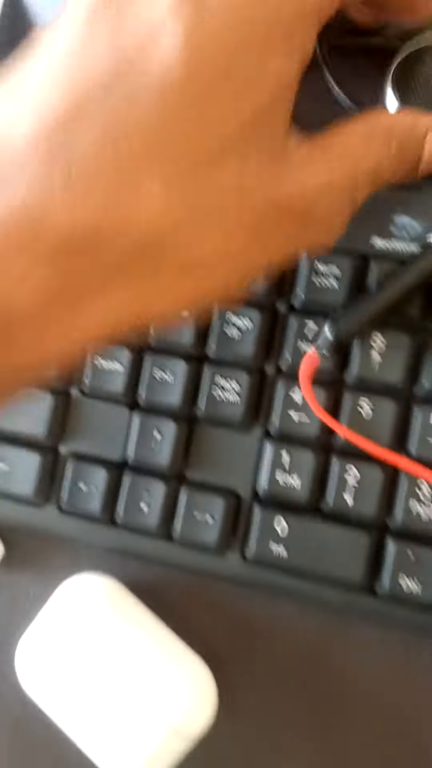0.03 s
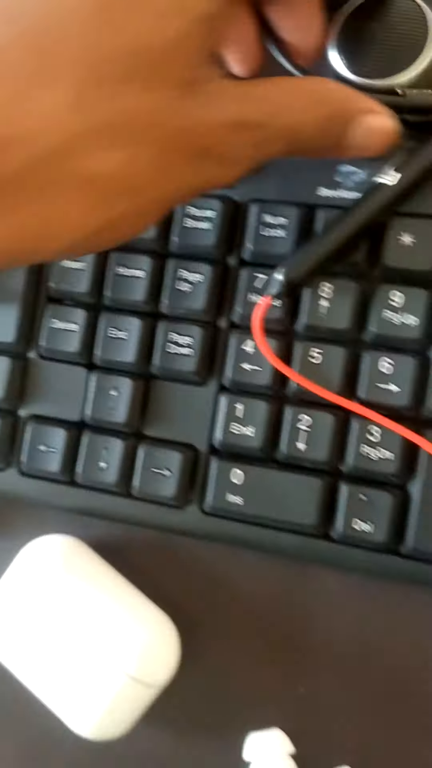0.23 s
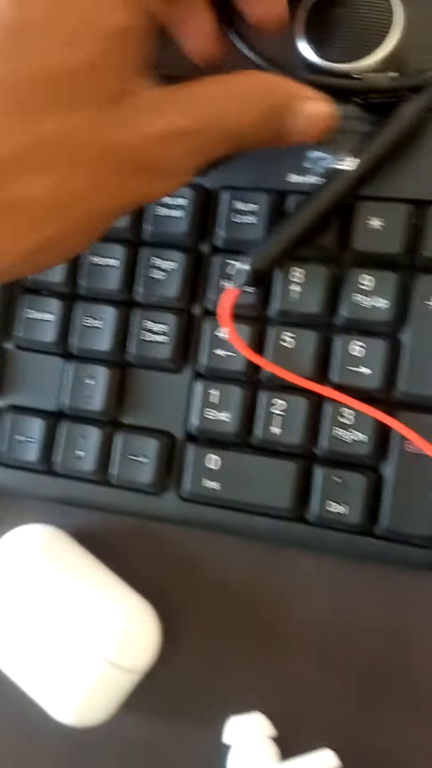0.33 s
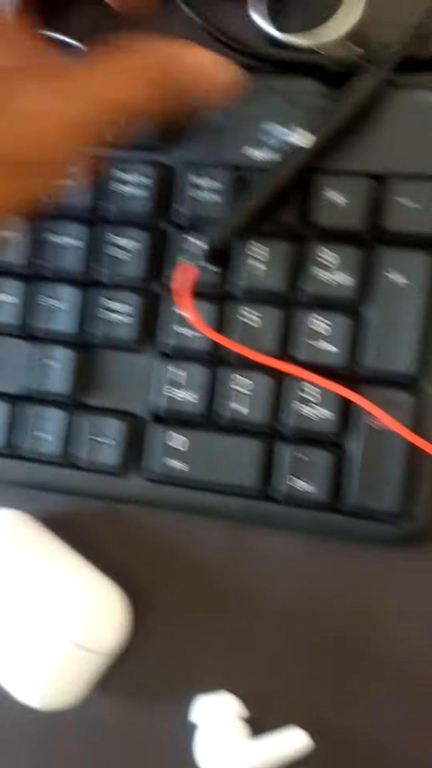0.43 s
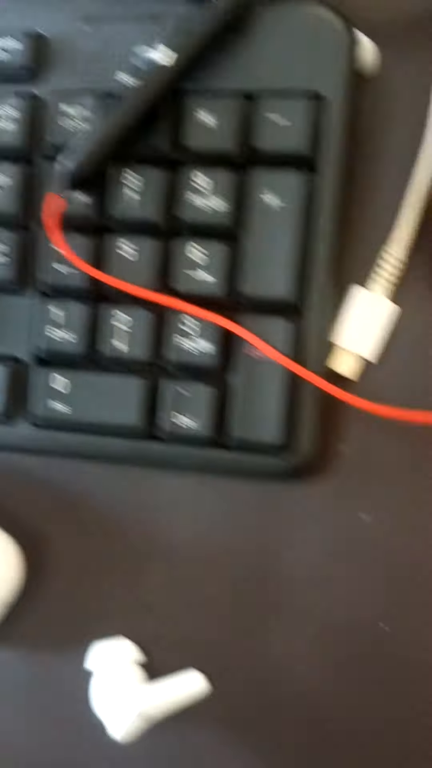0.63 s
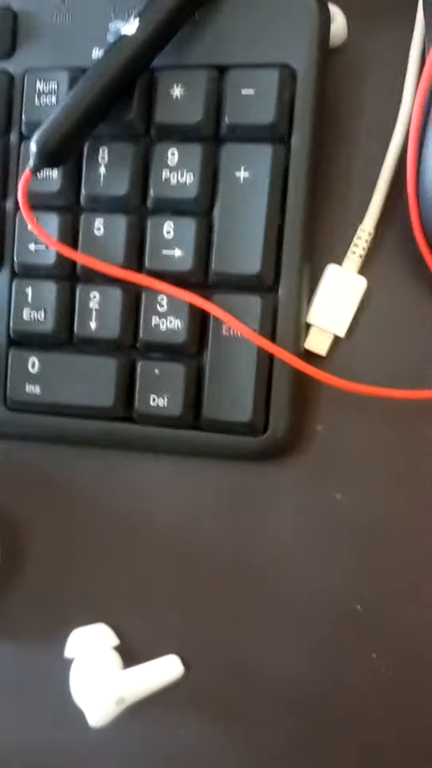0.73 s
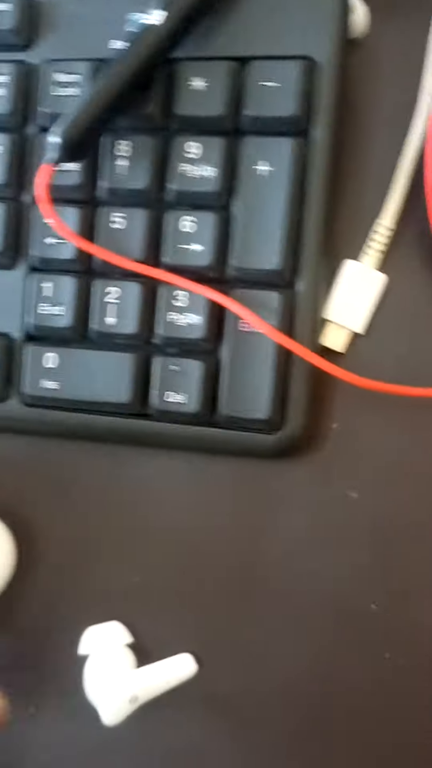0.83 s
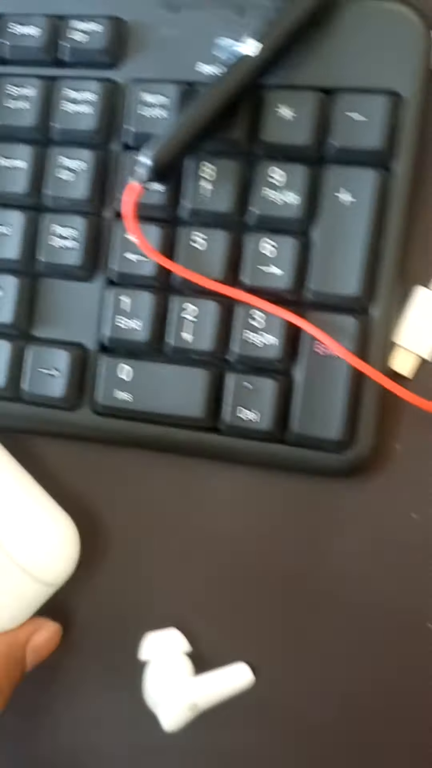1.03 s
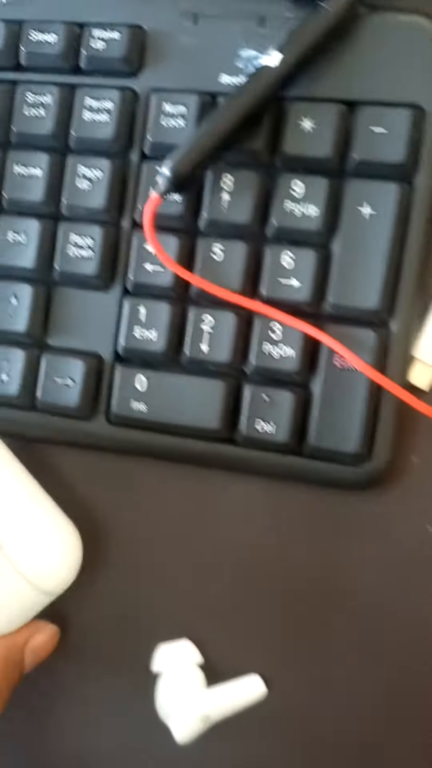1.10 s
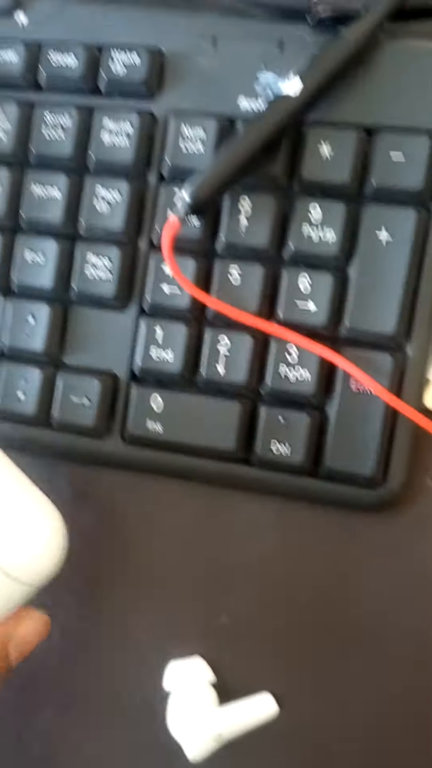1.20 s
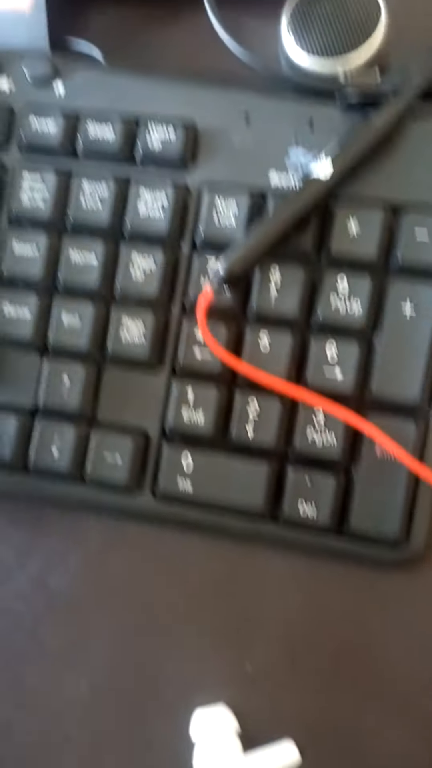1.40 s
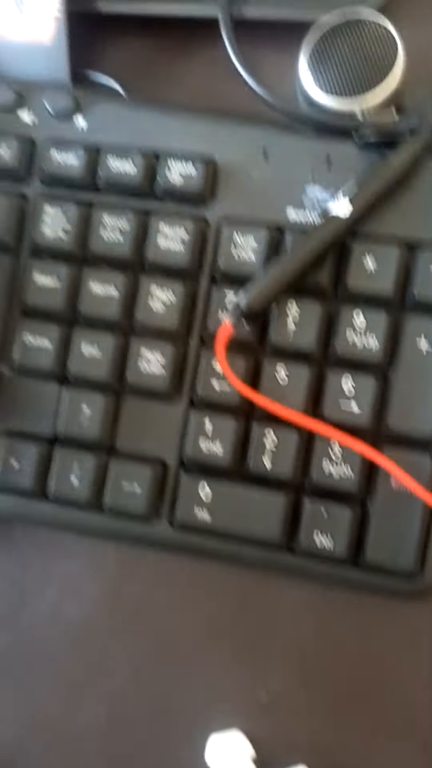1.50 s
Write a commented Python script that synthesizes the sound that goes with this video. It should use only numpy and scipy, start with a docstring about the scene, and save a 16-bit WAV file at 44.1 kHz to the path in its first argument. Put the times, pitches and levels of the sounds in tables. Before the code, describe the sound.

One close, dull thump as a plastic earbud case lands on a desk, over quiet rumble.

```python
"""A small plastic case is put down on a desk close by: it touches, lands and settles in one dull thump.
Each contact rings the desk top and the shell, the shell scuffs briefly and a small room answers.
A soft high hiss swells just before the thump and fades after it.
Handling adds a few light plastic ticks and soft low bumps. Behind it lie a quiet room rumble,
a low hum that swells and fades, steady tones and a faint whine."""
import sys
import numpy as np
from scipy import signal
from scipy.fft import rfft, irfft
from scipy.io import wavfile
from scipy.ndimage import uniform_filter1d

SR = 44100
rng = np.random.default_rng(int(sys.argv[2]) if len(sys.argv) > 2 else 0)


def master(y):
    """Save y as 16-bit WAV."""
    cut = np.clip(np.atleast_2d(y).T, -1, 1)
    pcm = np.round(cut * 32767)  # scale
    wavfile.write(sys.argv[1], SR, pcm.astype(np.int16))


N = 68355
TIME_S = np.arange(N) / SR
BINS_HZ = np.arange(N // 2 + 1) * SR / N


def undb(db):
    """Decibels to gain."""
    return 10 ** (np.asarray(db) / 20)


def unit(x):
    """Scale to rms 1."""
    return x / np.sqrt(np.mean(x ** 2))


def pan(side_db):
    """Left and right gains, side_db apart."""
    return undb(np.array([[side_db], [-side_db]]) / 2)


def decay(start_s, t60_s):
    """Silence until the start, then exponential decay."""
    age_s = TIME_S - start_s
    return (age_s >= 0) * np.exp(-np.log(1000) * np.maximum(age_s, 0) / t60_s)


def over_time(points):
    """Rows of (seconds, value) read at every sample."""
    return np.interp(TIME_S, *np.array(points).T)


def over_hz(points):
    """Rows of (Hz, value) read at every frequency bin."""
    hz, value = np.array(points, float).T
    return np.interp(np.log(np.maximum(BINS_HZ, 1)), np.log(hz), value)


def walk(rate_hz):
    """Smooth random motion, rms 1."""
    span = max(int(SR / rate_hz), 1)
    smoothed = uniform_filter1d(rng.standard_normal(N), span, mode="wrap")
    return unit(uniform_filter1d(smoothed, span, mode="wrap"))


def ring(x, response):
    """Pass a sound through an impulse response."""
    return signal.fftconvolve(np.atleast_2d(x), response, axes=1)[:, :N]


# Stereo image of the noise. Each row: frequency in Hz, left-right correlation.
CORRELATION = [(60, 0.64), (200, 1), (400, 0.78), (650, 0.38), (1200, 0.0072), (4000, 0.0089),
               (16000, -0.094)]


def stereo_noise(bin_gain):
    """Shaped noise at rms 1, alike on both sides in the bass."""
    mid, side = rfft(rng.standard_normal((2, N)))
    alike = np.clip(over_hz(CORRELATION), -1, 1)
    both = mid * np.sqrt(1 + alike) + np.array([[1], [-1]]) * side * np.sqrt(1 - alike)
    return unit(irfft(both * bin_gain, N))


def noise(spectrum, tilt_db_oct=0):
    """Stereo noise with a given spectrum and tilt."""
    tilted = [(hz, db + tilt_db_oct * np.log2(hz)) for hz, db in spectrum]
    return stereo_noise(undb(over_hz(tilted)))


def narrow_noise(hz, width_hz):
    """A noise band narrow enough to have a pitch."""
    return stereo_noise(1 / (1 + (2 * (BINS_HZ - hz) / width_hz) ** 2))


# Room noise spectrum. Each row: frequency in Hz, relative density in dB.
AIR_SPECTRUM = [(30, -30), (45, 0), (58, -2.5), (95, 1), (128, -2), (160, 4), (190, -6.5), (230, 2.5),
                (380, -0.5), (540, -9), (900, -5), (1100, -11.5), (1950, -12.5), (2800, -22.5),
                (5200, -25.5), (6800, -31), (8000, -41), (10000, -39.5), (13000, -36.5), (16000, -44)]
# Its slow drift. Each row: time in seconds, gain in dB.
AIR_DRIFT = [(0, 2), (.08, 2), (.22, 4), (.4, 2), (.65, 0), (.8, 0.6), (1.02, 1.5), (1.12, 0.5),
             (1.35, 1.5), (1.48, 2.5), (1.55, 3.5)]


def room_rumble(level_db=-38, waver_db=1.3, waver_below_hz=490):
    """Wavering rumble under an even hiss; both drift in level."""
    air = noise(AIR_SPECTRUM)
    rumble = irfft(rfft(air) / (1 + (BINS_HZ / waver_below_hz) ** 2), N)
    hiss = air - rumble
    waver = undb(waver_db * walk(rate_hz=17.6))
    return undb(level_db + over_time(AIR_DRIFT)) * (hiss + rumble * waver)


# Hum envelope. Each row: time in seconds, rms level in dB.
HUM_SWELL = [(0, -38), (.1, -42.5), (.2, -52), (.4, -43.5), (.65, -52.5), (.74, -41.5), (.97, -35.5),
             (1.08, -49), (1.22, -57), (1.32, -44), (1.41, -36), (1.47, -76), (1.55, -31.5)]


def hum(hz=107.9, wander=0.0092):
    """A low sine swells and fades, its pitch slightly unsteady."""
    cycles = np.cumsum(hz * (1 + wander * walk(rate_hz=9.5))) / SR
    return undb(over_time(HUM_SWELL)) * np.sqrt(2) * np.sin(2 * np.pi * cycles)


# Tones in the room. Each row: frequency in Hz, level in dB, width in Hz.
ROOM_TONES = [(162.2, -49.5, 11), (224.8, -49.5, 11.4), (345.5, -46.5, 2.7), (742.6, -55.5, 12),
              (914, -62.5, 19), (1323, -55, 57), (1848, -57.5, 49)]


def room_tones():
    """Faint pitched bands that sound throughout."""
    return sum(undb(db) * narrow_noise(hz, width_hz) for hz, db, width_hz in ROOM_TONES)


# Whine. Each row: start and end in seconds, frequency in Hz, level in dB, left over right in dB.
WHINE_SPELLS = [(0.7, 0.91, 1897, -58, -7), (1.3, 1.62, 1951, -54.5, 1)]


def whine(width_hz=32, fade_s=0.05):
    """A thin high band comes and goes."""
    out = 0
    for start_s, end_s, hz, db, side_db in WHINE_SPELLS:
        gate = np.clip(np.minimum(TIME_S - start_s, end_s - TIME_S) / fade_s, 0, 1)
        out += undb(db) * pan(side_db) * narrow_noise(hz, width_hz) * gate
    return out


# Reverb spectrum. Each row: frequency in Hz, relative density in dB.
REVERB_SPECTRUM = [(60, -24), (150, -4), (260, -1), (420, 7), (650, 6), (1000, -2.5), (3000, -9),
                   (12000, 1)]


def room_reverb(x):
    """Diffuse tail of a small room."""
    tail = noise(REVERB_SPECTRUM) * decay(start_s=0.015, t60_s=0.41)
    power_gain = np.mean(undb(over_hz(REVERB_SPECTRUM)) ** 2)
    return ring(x, tail * np.sqrt(power_gain / np.sum(tail[0] ** 2)))


# Handling nudges. Each row: start in seconds, level in dB.
NUDGES = [(0.054, -38), (0.237, -25.5), (0.289, -27), (1.309, -28.5)]


def bumps(hz=109.8, rise_s=0.012, t60_s=0.072):
    """Soft, low nudges swell and are quickly damped."""
    out = 0
    for start_s, db in NUDGES:
        age_s = TIME_S - start_s
        peak_s = start_s + rise_s
        envelope = np.where(TIME_S < peak_s, np.clip(age_s / rise_s, 0, 1), decay(peak_s, t60_s))
        out += undb(db) * envelope * np.sin(2 * np.pi * hz * age_s)
    return out


# Handling ticks. Each row: start in seconds, ping gain in dB, tilt in dB per octave,
# ping left over right in dB, rattle level in dB, rattle T60 in seconds.
TICK_HITS = [(0.0527, -37, -1, 13, -35, 0.035), (0.0991, -31, -4, 0, -37, 0.02),
             (0.249, -52, 0.5, -5, -31, 0.026), (0.249, -30, -6, 8.5, -36, 0.062),
             (0.2773, -52, 4, -3, -44, 0.012), (0.8795, -27.5, 1.5, -6.5, -39, 0.025),
             (0.8815, -29, -4.5, 8.5, -42, 0.015)]
# Modes of the ticking plastic. Each row: frequency in Hz, relative level in dB, T60 in seconds.
TICK_MODES = [(1050, -9, 0.011), (1955, -0.5, 0.0054), (4630, -0.5, 0.0078), (5340, -3, 0.0047),
              (6600, -8, 0.0031), (8300, -18, 0.0064), (11770, -6, 0.004), (13500, -4, 0.0042),
              (14750, -15, 0.004)]
# Rattle after a tick. Each row: frequency in Hz, relative density in dB.
RATTLE_SPECTRUM = [(500, -2), (1500, -3), (3000, 0), (5200, 0), (8500, -16.5), (12500, -5), (16000, -12)]


def ticks(pivot_hz=4000, right_lag_s=0.0001205):
    """Tiny hard contacts ring and rattle the plastic; sharper ones favour its high modes."""
    age_s = np.arange(N // 20) / SR - np.array([[0], [right_lag_s]])
    out = np.zeros((2, N))
    for start_s, db, tilt_db_oct, side_db, rattle_db, rattle_t60_s in TICK_HITS:
        ping = 0
        for hz, mode_db, t60_s in TICK_MODES:
            gain = undb(mode_db + tilt_db_oct * np.log2(hz / pivot_hz))
            ping += gain * np.sin(2 * np.pi * hz * age_s) * np.exp(-np.log(1000) * age_s / t60_s)
        first = int(start_s * SR)
        out[:, first:first + age_s.shape[1]] += undb(db) * pan(side_db) * ping * (age_s >= 0)
        out += undb(rattle_db) * noise(RATTLE_SPECTRUM, tilt_db_oct) * decay(start_s, rattle_t60_s)
    return out


# Brief scuffs and, at 0.156 s, a swelling hiss. Each row: start, attack, hold and release T60
# in seconds, level in dB, tilt in dB per octave.
NOISE_BURSTS = [(0.064, 0.0047, 0.017, 0.071, -42.5, 4.5), (0.076, 0.0022, 0.004, 0.049, -34, -5),
                (0.156, 0.095, 0.025, 0.38, -38.5, 4.5), (0.2408, 0.0072, 0.0069, 0.16, -31.5, 0.5),
                (0.254, 0.014, 0.017, 0.27, -34, -3.5)]
# Their spectrum. Each row: frequency in Hz, relative density in dB.
BURST_SPECTRUM = [(500, -2), (1000, 5), (2000, 6.5), (2900, -2.5), (4000, -2.5), (6000, -12.5), (8500, -23),
                  (10500, -21), (12300, -15), (16000, -23)]


def scuffs_and_hiss(grain_db=1.5):
    """Brief grainy scuffs of plastic; a soft high hiss swells just before the thump and fades after it."""
    out = 0
    for start_s, attack_s, hold_s, t60_s, db, tilt_db_oct in NOISE_BURSTS:
        end_s = start_s + attack_s + hold_s
        attack = np.clip((TIME_S - start_s) / attack_s, 0, 1) ** 2
        release = np.where(TIME_S < end_s, 1, decay(end_s, t60_s))
        grainy = noise(BURST_SPECTRUM, tilt_db_oct) * undb(grain_db * walk(rate_hz=740))
        out += undb(db) * attack * release * unit(grainy)
    return out


# Contacts of case and desk. Each row: start in seconds, impulse in dB, push length in ms.
CONTACTS = [(0.054, -21, 1.06), (0.0748, -22.5, 1.6), (0.2407, -6.5, 0.76), (0.2475, -0.5, 1.105),
            (0.2533, -10.5, 0.86), (0.2594, -0.5, 0.87), (0.2725, -6, 0.95), (0.277, -10, 0.71),
            (0.2906, -14, 0.93), (0.3143, -8.5, 0.92)]
# Modes of desk top and hard shell. Each row: frequency in Hz, relative level in dB, T60 in seconds.
DESK_MODES = [(94.6, -16, 0.12), (137.1, -11.5, 0.24), (204, -6.5, 1), (223.7, -2.5, 0.18), (250, 3, 0.095),
              (292.3, -4, 0.15), (303.8, -3.5, 0.21), (335.8, -4.5, 0.32), (377, -9.5, 0.28),
              (436.9, -13.5, 0.23), (523.5, -13, 0.18), (589.2, -16.5, 0.34), (629, -31, 0.14)]
SHELL_MODES = [(756, -22, 0.38), (830, -21, 0.19), (906, -19.5, 0.13), (968, -16.5, 0.2), (1074, -39, 0.12),
               (1347, -7.5, 0.083)]
# Knock of a contact. Each row: frequency in Hz, relative density in dB.
KNOCK_SPECTRUM = [(60, -10), (150, -0.5), (250, 15.5), (420, 7), (700, -16), (950, -3.5), (1400, -12),
                  (2200, -12), (4000, -41)]


def case_thump(modes_db=-14.5, knock_db=-18, right_lag_s=0.00026):
    """Each contact is a short soft push that rings desk top and shell, with a noisy knock."""
    force = np.zeros(N)
    for start_s, db, push_ms in CONTACTS:
        push = np.sin(np.pi * np.clip((TIME_S - start_s) * 1000 / push_ms, 0, 1))
        force += undb(db) * push / push.sum()
    lag_s = np.array([[0], [right_lag_s]])
    modes = sum(undb(db) * np.cos(2 * np.pi * hz * (TIME_S - lag_s)) * decay(lag_s, t60_s)
                for hz, db, t60_s in DESK_MODES + SHELL_MODES)
    knock = noise(KNOCK_SPECTRUM) * decay(start_s=0, t60_s=0.28)
    return ring(force, undb(modes_db) * modes + undb(knock_db) * knock)


def scene():
    """Thump and ticks with reverb; scuffs, hiss and bumps dry; background."""
    thump, clicks = case_thump(), ticks()
    reverb = room_reverb(undb(-11) * thump + undb(-12) * clicks)
    foreground = thump + clicks + reverb + scuffs_and_hiss() + bumps()
    return foreground + room_rumble() + hum() + room_tones() + whine()


# Microphone sensitivity. Each row: frequency in Hz, left over right in dB.
MIC_MISMATCH = [(60, 0.5), (200, 1.5), (380, -2.5), (700, -1.5), (1290, -2.5), (2380, 2), (4400, 1),
                (8000, -1), (15000, -1.5)]


def record(dry):
    """Two slightly unlike microphones drop the deepest bass and cut the top."""
    low_hz, top_hz = 57.7, 15900
    balance = undb(np.array([[.5], [-.5]]) * over_hz(MIC_MISMATCH))
    coloured = irfft(rfft(dry) * balance, N)
    thinned = signal.sosfilt(signal.butter(5, low_hz, "high", fs=SR, output="sos"), coloured)
    return signal.sosfilt(signal.ellip(10, .2, 80, top_hz, fs=SR, output="sos"), thinned)


dry = scene()
out = record(dry)
master(out)
```